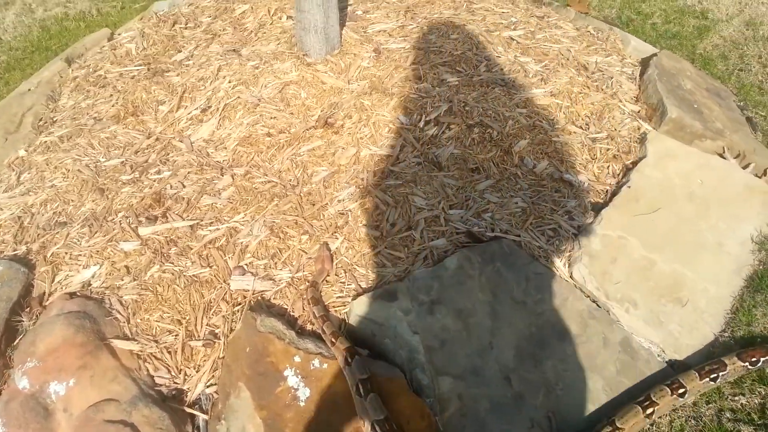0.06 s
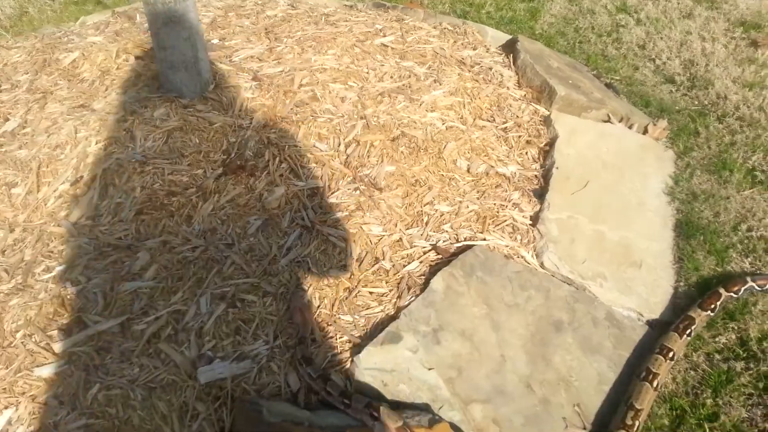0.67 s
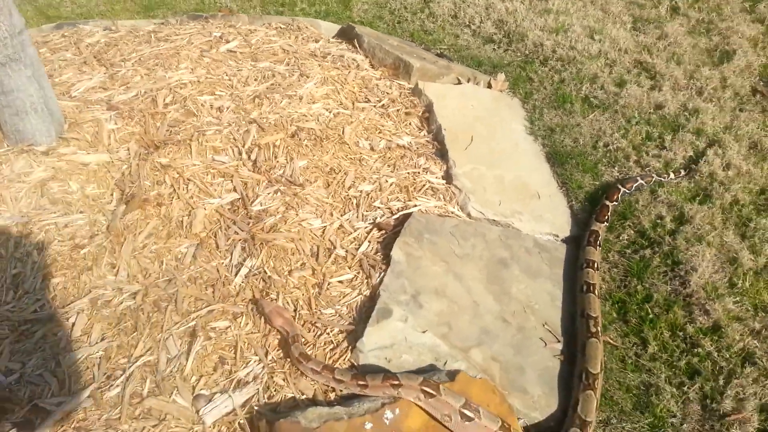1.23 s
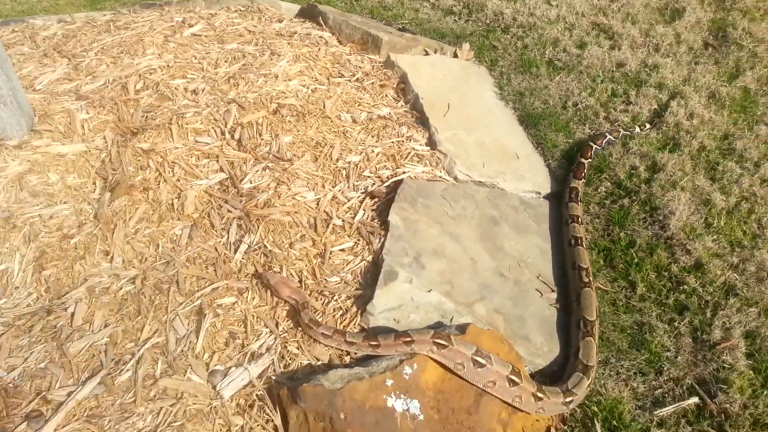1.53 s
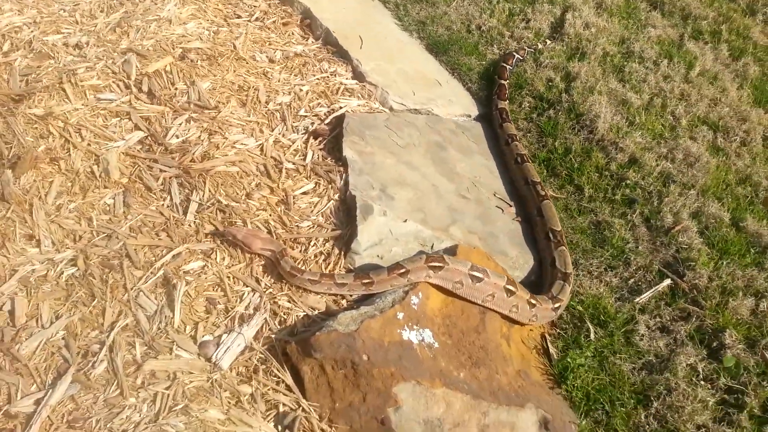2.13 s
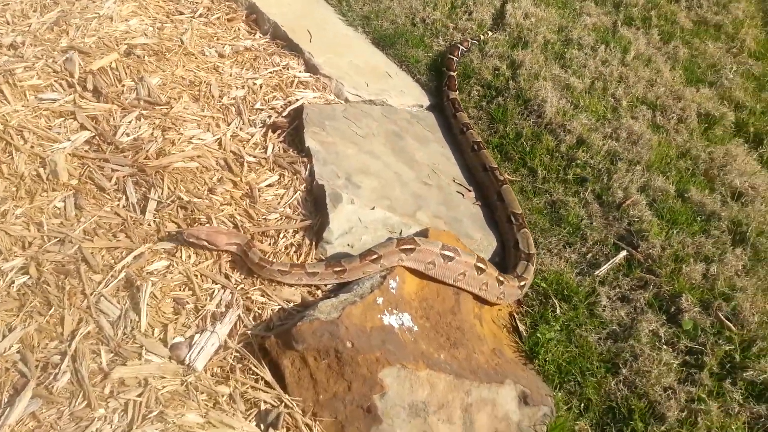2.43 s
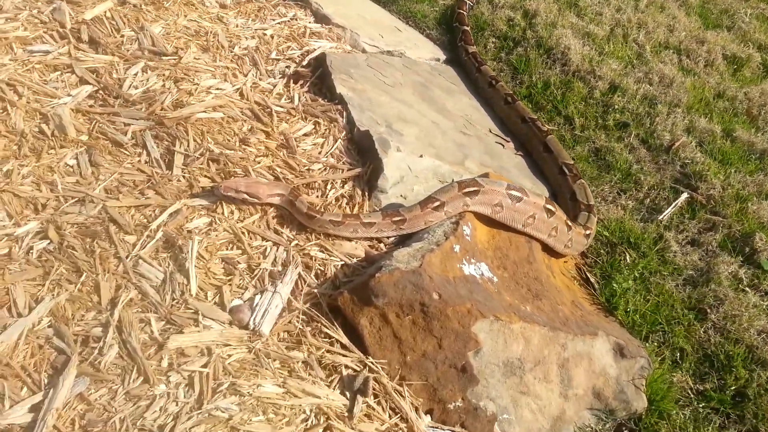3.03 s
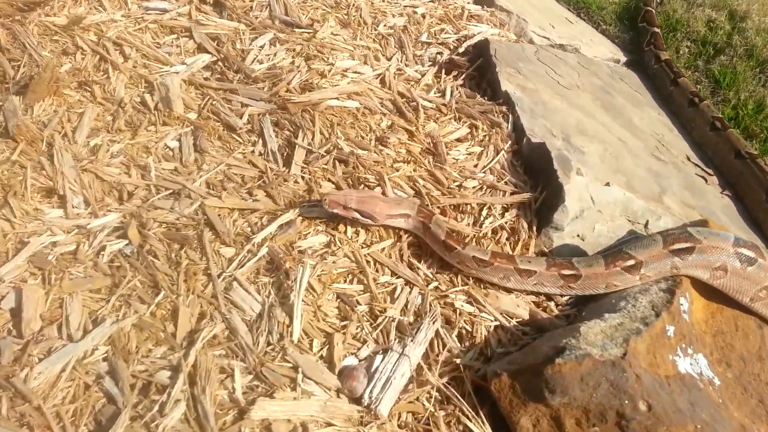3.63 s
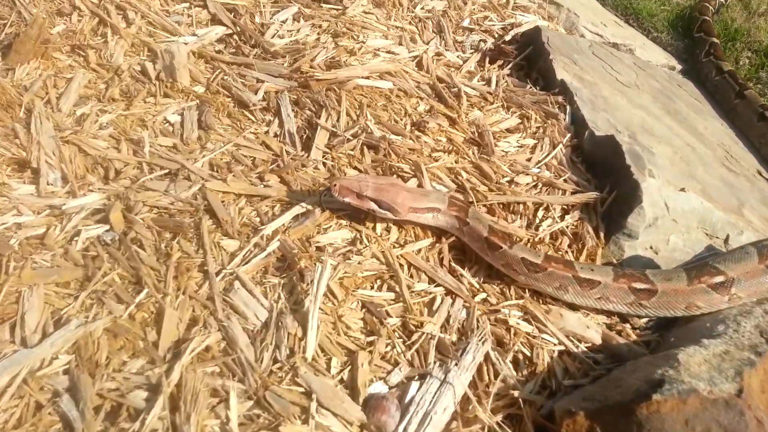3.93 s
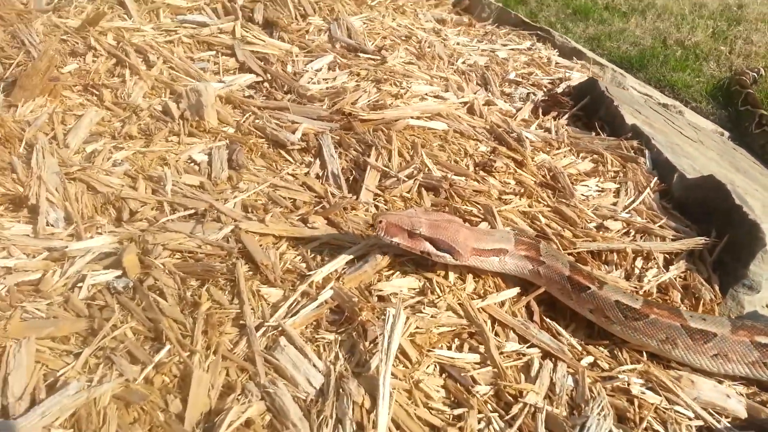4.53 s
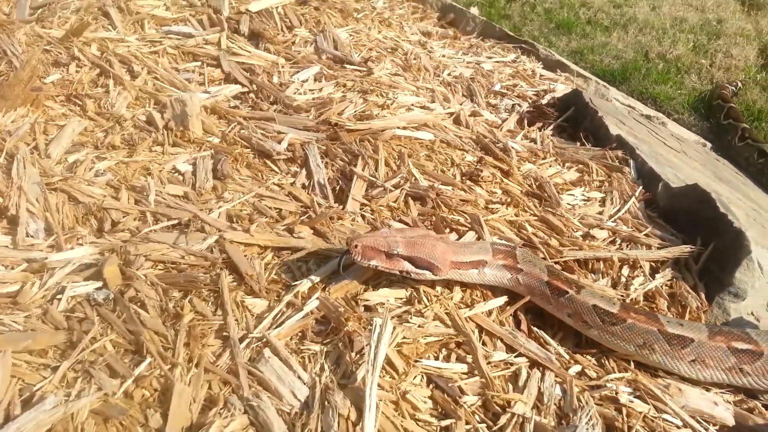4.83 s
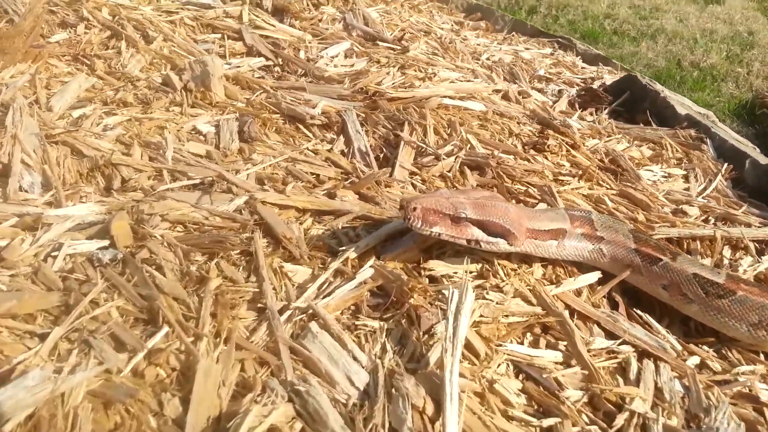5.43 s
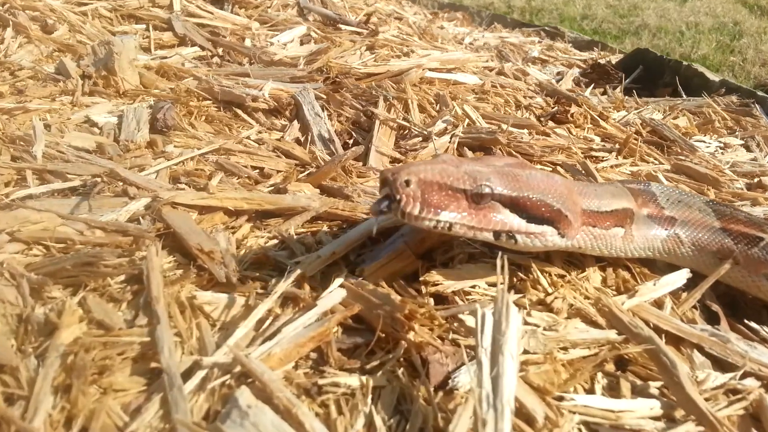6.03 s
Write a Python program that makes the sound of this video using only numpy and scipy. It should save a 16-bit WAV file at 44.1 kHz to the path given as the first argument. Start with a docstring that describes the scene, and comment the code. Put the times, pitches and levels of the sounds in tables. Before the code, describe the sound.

Dry mulch rustles and crackles in slow surges under a snake, over faint distant traffic, ending in close camera handling noise.

```python
"""A quiet garden: a large snake slides off a rock border into dry wood-chip mulch.
Chips and dry grass rustle in slow surges under its scales and single splinters snap,
over a low murmur of far traffic and open air. A distant engine hums for a while.
Near the end a hand-held camera is lowered: fingers rub, bump and tick on its case."""
import sys
import numpy as np
from scipy import signal
from scipy.fft import rfft, irfft, next_fast_len
from scipy.io import wavfile

SR = 44100
rng = np.random.default_rng(int(sys.argv[2]) if len(sys.argv) > 2 else 0)


def wav_record(signal):
    """Record a signal, one row per channel, as 16-bit PCM in the file named by sys.argv[1]."""
    frames = np.transpose(np.atleast_2d(signal))
    bounded = np.clip(frames, -1, 1)
    # unit amplitude maps onto the largest positive 16-bit level
    quanta = np.round(bounded * 32767).astype(np.int16)
    wavfile.write(sys.argv[1], SR, quanta)


N = 277124
TIME = np.arange(N) / SR


def from_db(db):
    """Decibels to gain."""
    return 10 ** (np.asarray(db) / 20)


def rms_one(x):
    """Scale to unit power."""
    return x / np.sqrt(np.mean(x ** 2) + 1e-20)


def cut(x, hz, kind, order=2):
    """Butterworth low- or high-pass."""
    return signal.sosfilt(signal.butter(order, np.clip(hz, 10, SR * 9 / 20), kind, fs=SR, output="sos"), x)


def coloured(x, spectrum):
    """Shape a flat sound with an EQ curve of (freq_hz, gain_db) points; rms 1."""
    hz, db = np.transpose(spectrum)
    size = next_fast_len(N)
    bins = np.maximum(np.fft.rfftfreq(size, 1 / SR), 1)
    gain = from_db(np.interp(np.log(bins), np.log(hz), db))
    return rms_one(irfft(rfft(x, size) * gain, size)[:N])


def drift(rate_hz):
    """Random modulation: noise low-passed at rate_hz (10 or more); rms 1."""
    return rms_one(cut(rng.standard_normal(N + SR), rate_hz, "low")[SR:])


def ring(x, hz, t60):
    """One mode: a unit click sets a sine of height 1 ringing."""
    r, w = from_db(-60 / (t60 * SR)), 2 * np.pi * hz / SR
    return signal.lfilter([0, np.sin(w)], [1, -2 * r * np.cos(w), r * r], x + 1e-18)


def resonate(x, modes):
    """Pass a sound through broad resonances in parallel."""
    return sum(from_db(db) * signal.lfilter(*signal.iirpeak(hz, hz / width, fs=SR), x)
               for hz, width, db in modes)


def add(track, s, sound, peak_db):
    """Lay a short sound into a track at its time and peak level."""
    start = int(s * SR)
    track[start:start + len(sound)] += (from_db(peak_db) * sound / np.abs(sound).max())[:N - start]


def air(trim_db=1.0, waver_db=1.5):
    """Far traffic and open air: a murmur with wavering lows and a steady top."""
    # colour of the murmur: freq_hz, gain_db
    murmur_eq = [(25, -30), (45, -15.5), (80, -5.5), (140, -5), (230, -1), (360, -7), (560, -11.5),
                 (1000, -15.5), (2000, -19.5), (5500, -26), (14000, -25)]
    # swell of the murmur, before the trim: time_s, level_db
    swell = [(0, -48.5), (.8, -48), (1.7, -49.5), (2.6, -50.5), (4.3, -51), (5.2, -50.5)]
    swell_db = np.interp(TIME, *np.transpose(swell))
    noise = coloured(rng.standard_normal(N), murmur_eq)
    low = cut(noise, 900, "low", order=1)
    top = (noise - low) * from_db(np.median(swell_db))
    return from_db(trim_db) * (low * from_db(swell_db + waver_db * drift(10)) + top)


def sliding(creep_db=-60, creep_fade_s=(3.4, 4.5), drop_db=10.5, roundness=1.27):
    """The snake's push as a level envelope in dB: overlapping surges on a faint creep that dies away."""
    # surges over dry litter: crest_s, level_db, rise_s, fall_s
    surges = [(0.162, -42, 0.035, 0.11), (0.415, -48, 0.53, 0.033), (0.675, -39, 0.034, 0.03),
              (0.751, -42.5, 0.047, 0.092), (0.872, -35.5, 0.015, .045), (0.935, -31, 0.038, 0.059),
              (1.325, -48, 0.52, 0.071), (1.633, -43, .15, 0.13), (1.76, -40, 0.086, 0.12),
              (1.998, -32, 0.057, 0.066), (2.25, -39.5, 0.054, 0.11), (2.299, -39, 0.0127, 0.046),
              (2.7, -47, .42, 0.11), (3.07, -48, 0.055, 0.064), (3.22, -44, 0.12, 0.09),
              (3.43, -50, 0.075, .1), (3.557, -36, 0.039, 0.17), (3.756, -40, 0.042, 0.029),
              (4.162, -48.5, 1, 0.16), (4.57, -54.5, 0.2, .027), (4.893, -55, 0.062, 0.14)]
    power = (from_db(creep_db) * np.interp(TIME, creep_fade_s, [1, 0])) ** 2 + 1e-9
    for crest, db, rise, fall in surges:
        away = np.maximum((crest - TIME) / rise, (TIME - crest) / fall)   # in rise or fall times
        near = away < 4
        power[near] += from_db(db - drop_db * away[near] ** roundness) ** 2
    return 10 * np.log10(power)


def crackle(per_s, spread_db, cycles, chip_sizes=14):
    """Tiny stick-slip releases, each ringing for a few cycles at the pitch of its chip; rms 1."""
    strengths = from_db(spread_db * np.minimum(rng.exponential(1, N), 5)) * rng.choice([-1, 1], N)
    clicks = strengths * (rng.random(N) < per_s / SR)
    chip = rng.integers(0, chip_sizes, N)
    pitches = np.geomspace(1800, 13500, chip_sizes)
    return rms_one(sum(ring(clicks * (chip == k), hz, cycles / hz) * hz for k, hz in enumerate(pitches)))


def rustle(slide_db, usual_db=-45, hiss_db=-0.5, grain_db=-3.0, grains_per_s=1600, flutter_db=1.14):
    """Scales slide over dry litter: fine friction hiss, with more grains the harder the push."""
    # colour of the dry surface: freq_hz, gain_db
    litter_eq = [(400, -19), (1000, -6), (1800, -6.5), (2800, -6.5), (4400, -3.5), (5800, -4), (7800, 0),
                 (11000, -1), (14500, 0.5)]
    push = from_db(slide_db - usual_db)
    hiss = coloured(rng.standard_normal(N), litter_eq)
    grains = coloured(crackle(grains_per_s * np.sqrt(push), spread_db=1.0, cycles=3.4), litter_eq)
    surface = cut(from_db(hiss_db) * hiss + from_db(grain_db) * grains, 1800, "high")
    sound = from_db(slide_db) * surface + crunch(slide_db)
    return sound * from_db(flutter_db * drift(47))


def crunch(slide_db, level_db=-51, at_slide_db=-41, follows=0.59, grit_db=2.1):
    """Deeper chips grind against each other, duller under their cover, partly following the surges."""
    # colour of the buried chips: freq_hz, gain_db
    buried_eq = [(100, -27), (300, 0), (1100, 4), (2200, -3), (4500, -4), (12000, -32)]
    grinding = rng.standard_normal(N) * from_db(grit_db * drift(290))
    return from_db(level_db + follows * (slide_db - at_slide_db)) * coloured(grinding, buried_eq)


def small_snaps(slide_db, usual_db=-45, per_s=16, level_db=-33.5, spread_db=5.5, follows=0.45, count=600):
    """Cues for snaps(): strained splinters give way at random, more often and louder in a surge."""
    when, luck, size = rng.random((count, 3)).T
    push_db = slide_db[(when * N).astype(int)] - usual_db
    peak_db = level_db + follows * push_db + spread_db * rng.standard_normal(count)
    pitch_hz = 2780 * (11000 / 2780) ** size
    knock_db = np.zeros(count)
    cues = np.column_stack([when * N / SR, peak_db, pitch_hz, knock_db])
    breaks = luck < per_s * from_db(push_db) * N / SR / count
    return cues[breaks].tolist()


def snaps(slide_db, crack=0.04, settle_db=-25, settle_s=0.0032, wood_hz=2600, wood_db=-16, cycles=6):
    """A splinter breaks with a sharp crack, it and its chip ring briefly, and the chips around settle."""
    # featured splinters: start_s, peak_db, pitch_hz, knock_db (the chip's knock, relative to wood_db)
    splinters = [(0.415, -21.5, 6900, 1), (0.7564, -22, 6360, 0.5), (0.9368, -5, 9600, -16),
                 (0.956, -16, 4760, -23), (0.9788, -11, 10000, -19), (1.007, -18.5, 7740, -25),
                 (1.1561, -16, 7750, -19), (1.1665, -15, 8240, 11), (1.1953, -15, 8100, -14),
                 (1.198, -15.5, 7650, 13), (1.2165, -22.5, 10400, 12), (1.2566, -32, 2900, 1),
                 (1.2836, -27, 5000, 21), (1.2974, -24, 7500, -12), (1.3118, -6, 10600, -30),
                 (1.8706, -19, 11300, -9), (1.917, -18, 7400, -20), (2.1168, -31.5, 2700, -1.5),
                 (2.2939, -17, 10400, -21), (3.2462, -31, 1690, -8), (3.4153, -14.5, 13400, 2),
                 (3.5482, -11, 9900, -12), (3.63, -17.5, 6020, -7)]
    out, t = np.zeros(N), TIME[:SR // 20]
    for s, peak_db, hz, knock_db in splinters + small_snaps(slide_db):
        force = (t == 0) + from_db(settle_db) * rng.standard_normal(len(t)) * np.exp(-t / settle_s)
        knock = from_db(knock_db + wood_db) * ring(force, wood_hz * rng.uniform(0.54, 1.14), t60=0.002)
        snap = ring(force, hz, cycles / hz) + knock + crack * force
        add(out, s, cut(snap, min(hz / 2, 2200), "high", order=3), peak_db)
    return out


def engine_hum(hz=139.0, wobble_hz=0.45, level_db=-60, waver_db=4.0, hold_s=(2.42, 4.7), fade_s=0.33):
    """A far engine fades in, holds one low, slightly unsteady note and fades out."""
    swell = np.clip(1 + np.minimum(TIME - hold_s[0], hold_s[1] - TIME) / fade_s, 0, 1)
    phase = 2 * np.pi * np.cumsum(hz + wobble_hz * drift(10)) / SR
    return swell * from_db(level_db + waver_db * drift(10)) * np.sqrt(2) * np.sin(phase)


def finger_rubs(grit_db=2.5, slip_db=4.5, taper=1.52):
    """Skin slides on the case: a hiss, hollow under a cupped finger, and a judder that rings the shell."""
    # finger strokes: start_s, length_s, hiss_db, edge_hz, judder_db, hollowness (0-1)
    strokes = [(5.3352, 0.027, -24.5, 11000, -32, 0.3), (5.38, 0.058, -29, 10100, -45, 0.3),
               (5.401, 0.012, -28, 10900, -46.5, 0), (5.456, 0.041, -37.5, 11000, -44, 0.6),
               (5.497, 0.022, -30, 12000, -31.5, 0), (5.503, 0.063, -25.5, 10800, -50, 0.06),
               (5.595, 0.095, -39, 12000, -45, 0.44), (5.698, 0.13, -36, 9450, -42, 0.74),
               (5.821, 0.031, -50, 9500, -36.5, 0), (5.831, 0.19, -35.5, 9100, -52.5, 0.67),
               (5.992, 0.14, -35.5, 10600, -45.5, 0.38), (6.188, 0.015, -32, 5600, -38, 0),
               (6.215, 0.0061, -36, 7100, -24.5, 0), (6.162, 0.12, -40.5, 8360, -44.5, 0),
               (6.249, 0.05, -49, 8000, -33, 0)]
    # colour of skin friction: freq_hz, gain_db
    skin_eq = [(40, -10), (110, 15), (280, 13), (700, 3), (1300, 6), (2600, 1), (3800, 4.5), (5500, 4),
               (8000, 8), (11000, 7.5), (15000, 3.5)]
    # resonances of the gap under a cupped finger: centre_hz, width_hz, gain_db
    gap_modes = [(2700, 780, 7.5), (5400, 2100, 0.5)]
    # resonances of the shell under a juddering finger: centre_hz, width_hz, gain_db
    shell_modes = [(590, 97, 3.5), (825, 220, 1), (1290, 390, 0)]
    hiss = coloured(rng.standard_normal(N), skin_eq) * from_db(grit_db * drift(134))
    cupped = resonate(hiss, gap_modes)
    slips = rng.standard_normal(N) * from_db(slip_db * drift(70))
    judder = rms_one(cut(resonate(slips, shell_modes), 1330, "low"))
    out = np.zeros(N)
    for start, length, hiss_db, edge_hz, judder_db, hollowness in strokes:
        on = (TIME > start - length) & (TIME < start + 2 * length)
        # pressure builds to the middle of the stroke and eases off again
        pressure = np.exp(-(2 * (TIME[on] - start) / length - 1) ** 2 * taper)
        friction = cut(hiss[on] + hollowness * (cupped[on] - hiss[on]), edge_hz, "low", order=3)
        out[on] += pressure * (from_db(hiss_db) * friction + from_db(judder_db) * judder[on])
    return out


def finger_bumps(port_hz=200, leak_hz=55, skin_hz=1100, scuff_db=-20, scuff_s=0.011):
    """A fingertip lands with a scuff; the microphone's bass cut turns its soft pulse into a thump."""
    # fingertip landings by the microphone: start_s, peak_db, sharpness_hz
    landings = [(5.339, -25.5, 299), (5.5021, -29, 260), (6.013, -3.2, 460), (6.0566, -14.5, 230),
                (6.102, -18, 210)]
    out, t = np.zeros(N), TIME[:SR // 10]
    for s, peak_db, sharpness_hz in landings:
        pulse = cut(cut(signal.unit_impulse(len(t)), sharpness_hz, "low"), skin_hz, "low")
        thump = -cut(cut(pulse, port_hz, "high"), leak_hz, "high")
        scuff = rng.standard_normal(len(t)) * np.exp(-t / scuff_s)
        add(out, s, thump, peak_db)
        add(out, s, scuff, peak_db + scuff_db)
    return out


def case_ticks(bass_cut_hz=260, rebound=0.33, rebound_s=0.00027):
    """The case gives under the grip and springs back; softer contacts reach only its low modes."""
    # flexes of the case: start_s, peak_db, sharpness_hz
    flexes = [(5.4681, -16, 1460), (5.5109, -10, 1020), (5.7185, -14.5, 4400), (5.7496, -14.5, 1700),
              (5.8028, 0.5, 9000), (5.8228, -28, 1200), (5.865, -15.5, 2510), (6.0704, -24.5, 1200),
              (6.1883, -5, 7300), (6.1958, -22, 1200), (6.2154, -18, 3000), (6.2564, -20.5, 900)]
    # modes of the case: pitch_hz, gain_db, t60_s
    case_modes = [(262, -32.5, 0.02), (656, -32, 0.024), (1430, -21.5, 0.0033), (2130, -25, 0.0015),
                  (4780, -24, 0.0024)]
    out, size = np.zeros(N), SR // 20
    force = signal.unit_impulse(size) - rebound * signal.unit_impulse(size, round(rebound_s * SR))
    for s, peak_db, sharpness_hz in flexes:
        body = sum(ring(force, hz, t60) * from_db(db + rng.standard_normal()) for hz, db, t60 in case_modes)
        tick = cut(body + force, sharpness_hz, "low")
        add(out, s, -cut(tick, bass_cut_hz, "high"), peak_db)
    return out


def scene():
    """Garden bed, camera handling and the snake in the mulch, the same in both channels."""
    slide_db = sliding()
    garden = air() + engine_hum()
    handling = finger_rubs() + case_ticks() + finger_bumps()
    mulch = rustle(slide_db) + snaps(slide_db)
    sound = garden + handling + mulch
    return np.array([sound, sound])


def record(dry, cutoff_hz=14500):
    """A steep low-pass takes off the very top."""
    return signal.sosfilt(signal.ellip(10, .1, 70, cutoff_hz, fs=SR, output="sos"), dry)


dry = scene()
out = record(dry)
wav_record(out)
```